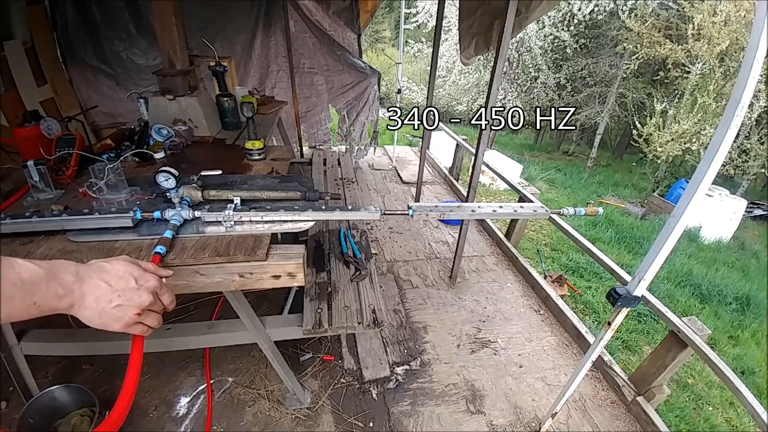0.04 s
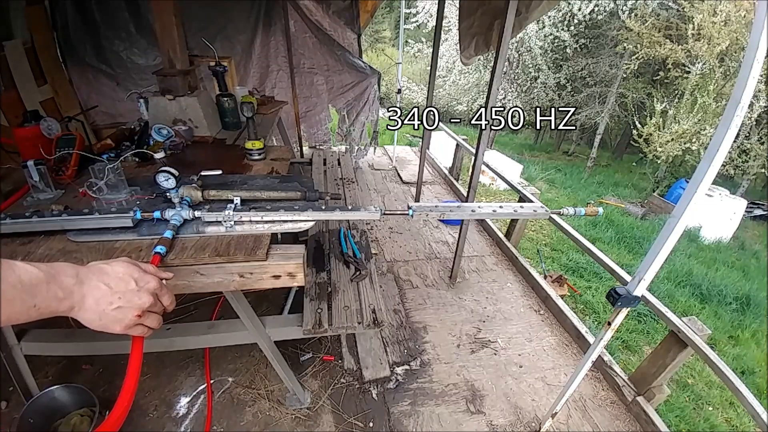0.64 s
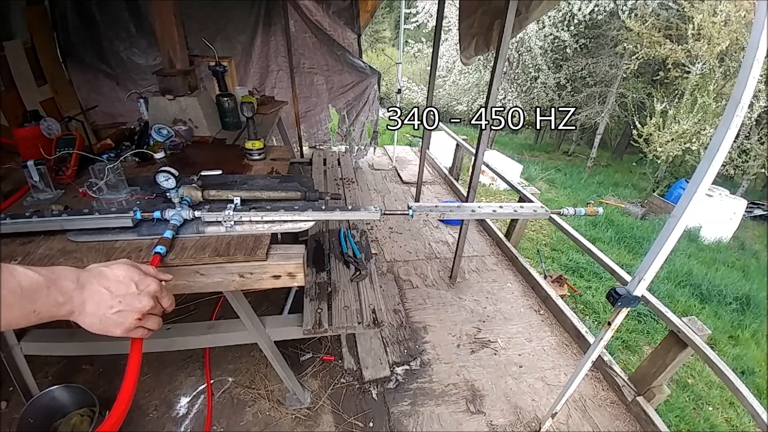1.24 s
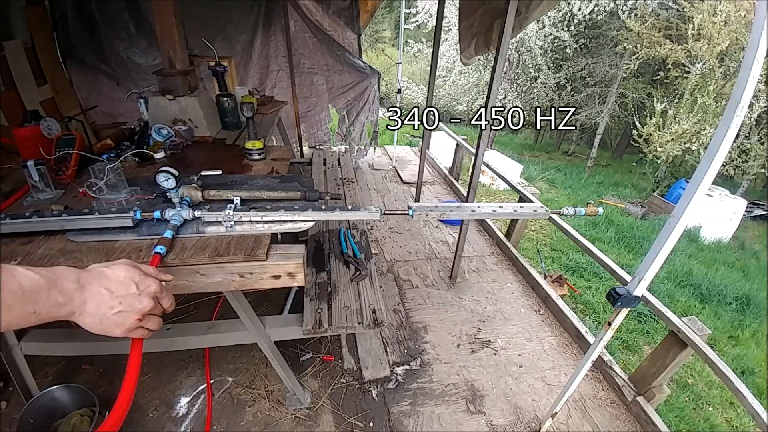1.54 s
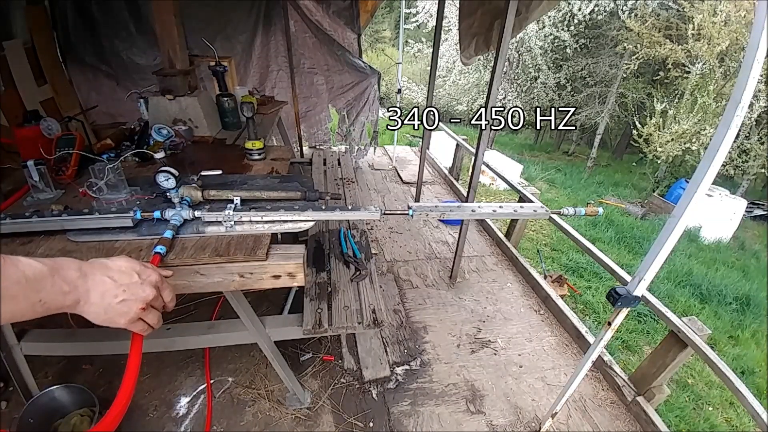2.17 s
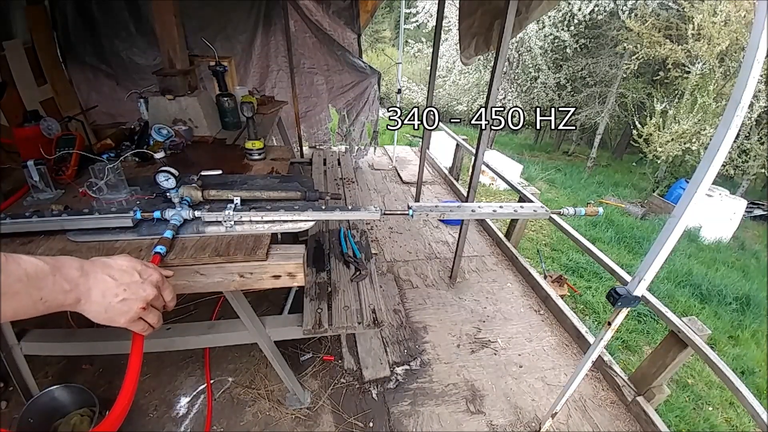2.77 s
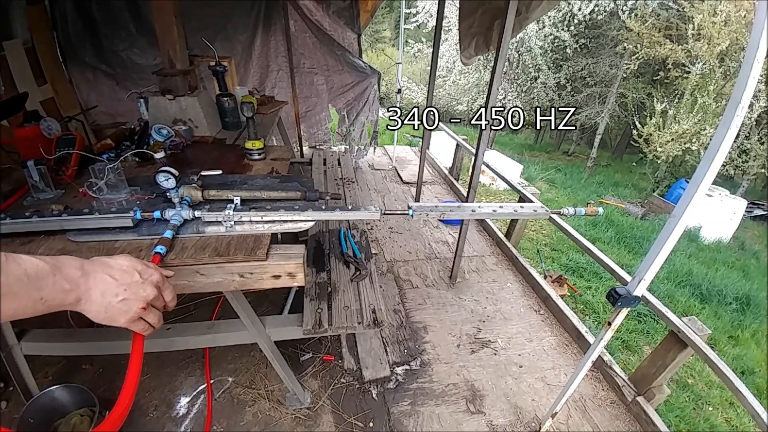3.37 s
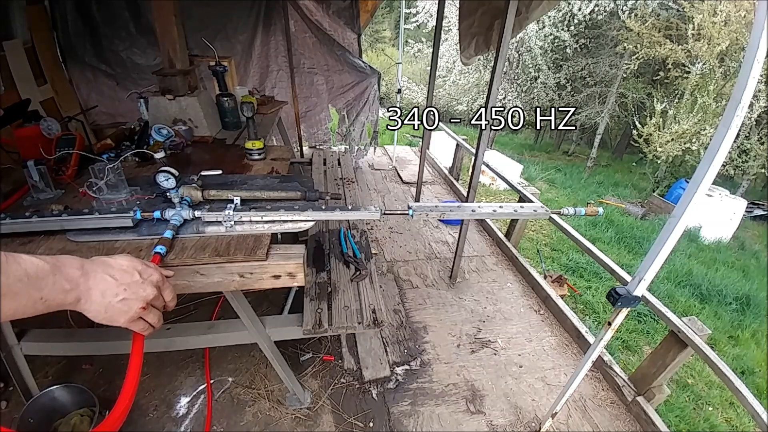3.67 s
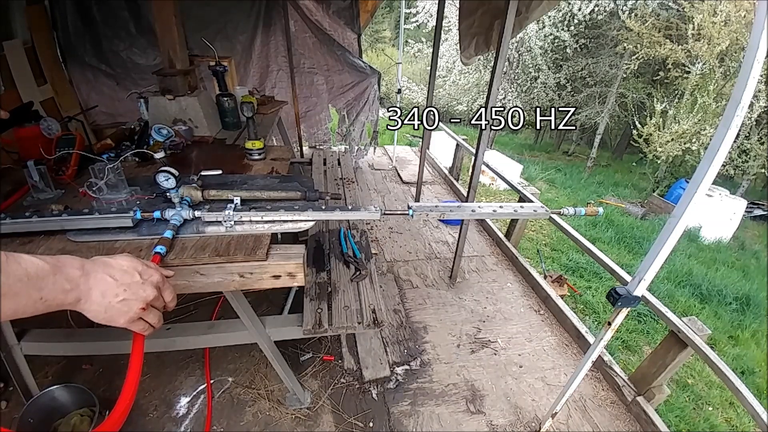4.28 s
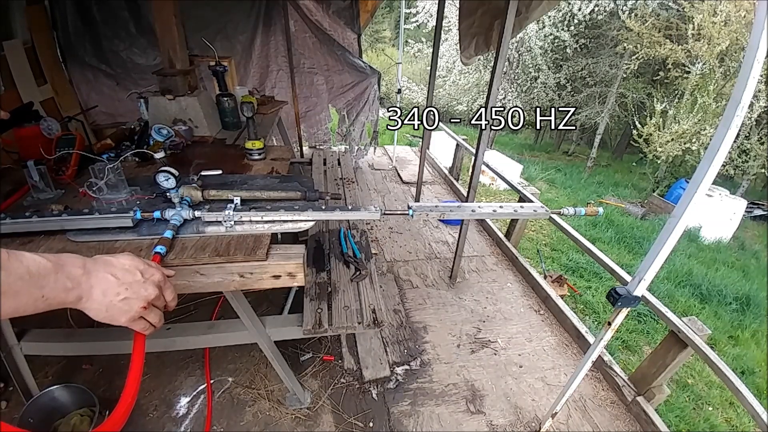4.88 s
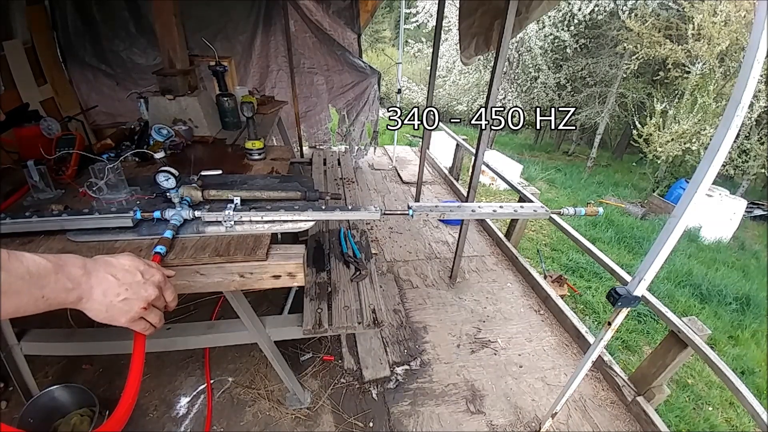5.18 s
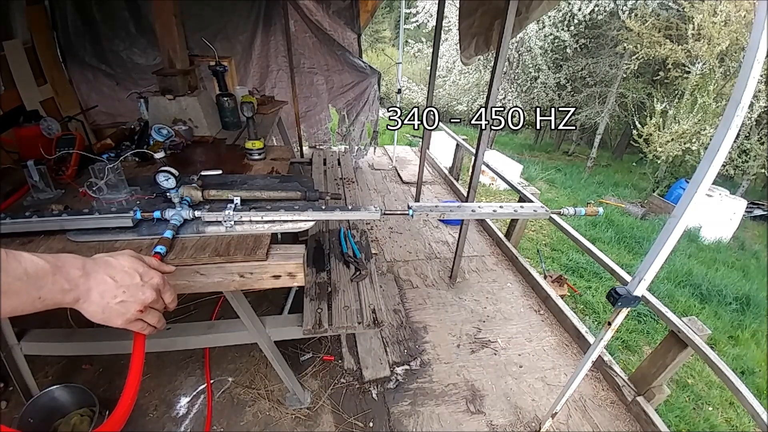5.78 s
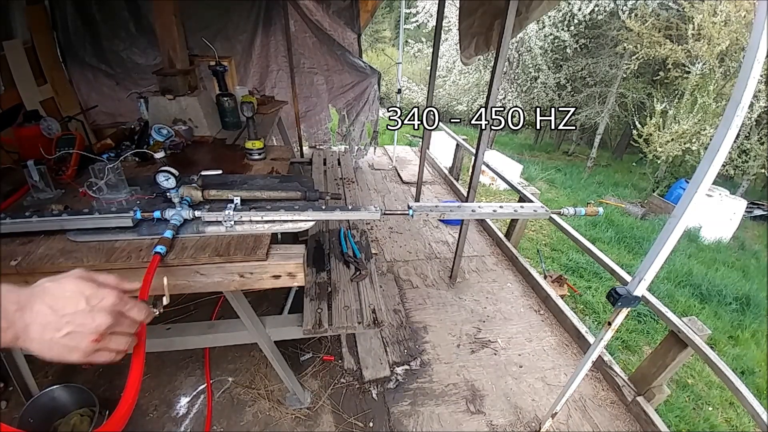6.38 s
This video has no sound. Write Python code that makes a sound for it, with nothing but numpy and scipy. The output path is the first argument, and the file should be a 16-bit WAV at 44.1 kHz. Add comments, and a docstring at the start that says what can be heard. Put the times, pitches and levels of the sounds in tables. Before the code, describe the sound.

Loud, slightly overloaded buzzing drone of a homemade pulse jet, which rises in pitch, sputters and pops, then runs on steadily.

```python
"""Pulse jet on a bench

A small homemade pulse jet runs flat out in an open shelter, close to an overloaded stereo microphone.
The flame locks to the lowest pipe mode and fires about 300 times a second: a strong tone, ragged
overtones, flame roar and a burst of jet noise on every cycle. Now and then it falters; near two seconds
the pitch climbs, the firing breaks into a sputter with ringing pipe modes, then catches again."""
import sys
import numpy as np
from scipy import signal
from scipy.fft import rfft, irfft, next_fast_len
from scipy.io import wavfile
from scipy.ndimage import uniform_filter1d

SR = 44100
rng = np.random.default_rng(int(sys.argv[2]) if len(sys.argv) > 2 else 0)


def unload_wav(signal):
    """Save mono or channel-first audio to the path in sys.argv[1] as 16-bit WAV at rate SR, clipped to [-1, 1]."""
    wavfile.write(
        sys.argv[1],
        SR,
        np.round(np.clip(np.atleast_2d(signal).T, -1, 1) * 32767).astype(np.int16),
    )


N = 291942

# resonances of engine and shelter: f/Hz, bandwidth/Hz, level/dB
SHELTER_MODES = [(600.8, 24, -5), (810, 29, -9), (897, 26, -4.5), (967, 35, 1.5), (1034, 66, 5),
                 (1193, 59, 1.5), (1261, 16, 5), (1486.5, 27, 0.5), (1789, 34, -4), (2510, 440, -27),
                 (3230, 81, -25), (3760, 38, -42)]
# stalls, in which the flame loses the pipe: start t/s, catch t/s, depth (0-1), pop level/dB
STALLS = [(1.885, 2.002, 1, -12), (2.099, 2.541, .97, -16), (2.598, 2.663, 0.89, -33),
          (2.715, 2.754, .75, -12), (5.545, 5.567, 0.42, -17)]


def from_db(db):
    """Amplitude ratio of a level in decibels."""
    return 10 ** (np.asarray(db) / 20)


def rms_one(x):
    """Normalisation to unit rms."""
    return x / np.sqrt(np.mean(x ** 2) + 1e-20)


def colour(x, curve):
    """Zero-phase filtering by a curve (f/Hz, level/dB), interpolated in log frequency."""
    size = next_fast_len(N + 4096)
    hz, db = np.transpose(curve)
    bins_hz = np.maximum(np.fft.rfftfreq(size, 1 / SR), 1)
    response = from_db(np.interp(np.log(bins_hz), np.log(hz), db))
    return irfft(rfft(x, size) * response, size)[..., :N]


def drift(rate_hz):
    """Random fluctuation of unit rms: noise low-passed near rate_hz."""
    pole = np.exp(-20 * np.pi * rate_hz / SR)  # at a tenth of the sample rate
    slow = signal.lfilter([1], [1, -2 * pole, pole * pole], rng.standard_normal(N // 10 + 2002))[2000:]
    return np.interp(np.arange(N) / 10, np.arange(len(slow)), rms_one(slow))


def resonance(x, hz, width_hz):
    """Forced response of a damped resonator with unit peak gain."""
    radius = np.exp(-np.pi * width_hz / SR)
    feedback = [1, -2 * radius * np.cos(2 * np.pi * hz / SR), radius ** 2]
    return signal.lfilter(np.array([1, 0, -1]) * (1 - radius ** 2) / 2, feedback, x)


def ring(x, modes):
    """Modal superposition: a body responds as the sum of its resonances."""
    return sum(from_db(db) * resonance(x, hz, width_hz) for hz, width_hz, db in modes)


def turbulence(diffuse):
    """Partly coherent white noise: the diffuse share of its power differs between the two ports."""
    coherent = np.sqrt(1 - diffuse) * rng.standard_normal(N)
    return coherent + np.sqrt(diffuse) * rng.standard_normal((2, N))


def faltering(falters, late_s, sigma_s):
    """A Gaussian pulse for each falter, as high as its rise in firing rate."""
    t = np.arange(0, N, 20) / SR
    bumps = sum(rise_hz * np.exp(-.5 * ((t - at_s - late_s) / sigma_s) ** 2) for at_s, rise_hz in falters)
    return np.interp(np.arange(N) / SR, t, bumps)


def swells(times, heights, peak_s):
    """Critically damped impulse responses, each reaching its height after peak_s."""
    age = np.maximum(np.arange(N) / SR - times[:, None], 0) / peak_s
    return (heights[:, None] * age * np.exp(1 - age)).sum(axis=0)


def firing_phase(rate_hz, strain, sputter, sag_hz):
    """Frequency modulation: the firing wavers under strain and turns slow and erratic in a stall."""
    wander_hz = (2.944 + 2.57 * strain) * drift(24.277)
    jitter_hz = (5.57 + 28.08 * sputter) * drift(162.5)
    return 2 * np.pi * np.cumsum(rate_hz - sag_hz * sputter + wander_hz + jitter_hz) / SR


def pipe_tone(phase, sputter, rough_db):
    """Standing wave of the lowest pipe mode; sputtering deepens its random amplitude modulation."""
    return np.sqrt(2) * np.cos(phase) * from_db(rough_db * (1 + 3 * sputter) * drift(70))


def overtones(phase, sputter, rough_db, jitter_rad):
    """Steep, uneven exhaust fronts carry harmonics, which honk as they sweep through the resonances."""
    front = phase + jitter_rad * drift(147)
    harmonics = sum(from_db(rough_db * drift(60)) * np.cos(k * front) for k in np.arange(2, 13))
    return ring(harmonics, SHELTER_MODES) * (1 - 0.45 * sputter)


def flame_roar(phase, throb, modes_db):
    """Combustion noise, amplitude-modulated by the firing, excites engine and shelter resonances."""
    # spectrum of the flame: f/Hz, relative level/dB
    roar_spectrum = [(25, -5.5), (130, -6.5), (240, 6), (330, 8.5), (390, -1.5), (520, 4.5), (650, -1.5),
                     (780, 5.5), (1130, -2.5), (1420, -24), (1750, 3.5), (2200, -41), (4000, -47)]
    noise = turbulence(diffuse=0.64) * (1 + throb * np.cos(phase))
    return rms_one(colour(noise, roar_spectrum) + from_db(modes_db) * ring(noise, SHELTER_MODES))


def jet_noise(phase, burst_db, crackle_db):
    """Turbulent mixing noise: hot gas tears out once a cycle, in bursts of uneven strength."""
    # the hiss as heard through the microphone, with a notch near 10.5 kHz: f/Hz, relative level/dB
    heard_hiss_spectrum = [(500, -31), (1400, -3), (2100, -2.5), (3100, 0), (3900, 0.5), (5000, -1.5),
                           (7000, -5.5), (8500, -0.5), (9400, -3), (10500, -27), (11800, -15.5),
                           (13500, -11), (15600, -19)]
    # resonances that the jet excites: f/Hz, bandwidth/Hz, level/dB
    jet_modes = [(2564, 44, -2.5), (3080, 23, 0.5), (3556, 32, 2), (4620, 28, -5)]
    burst = np.cos(phase - 1.0) + 0.14 * np.cos(2 * phase - 1.3)
    outflow = turbulence(diffuse=0.72) * from_db(burst_db * burst + crackle_db * drift(180))
    hiss = colour(outflow, heard_hiss_spectrum)
    return rms_one(hiss + ring(hiss, jet_modes))


def pipe_ringing(flare_db):
    """Broadband excitation: uneven puffs of turbulence drive the higher modes of the pipe."""
    # higher pipe modes: f/Hz, bandwidth/Hz, relative level/dB
    pipe_modes = [(753.5, 19.1, 8.5), (1043, 58, 10.5), (1794, 18.6, 6.5), (2606, 100, -5.5),
                  (2790, 36, -9), (3599, 64, -3.5), (4390, 41, -13), (4830, 50.7, -6), (6110, 28, 1),
                  (8160, 300, -1.5), (13100, 2800, -21)]
    puffs = turbulence(diffuse=.17) * from_db(flare_db * drift(25))
    return rms_one(ring(puffs, pipe_modes))


def slight_falters(count, max_rise_hz):
    """Random perturbations of the firing, one in each equal stretch of the run: t/s, rise/Hz."""
    return [((k + when) / count * N / SR, max_rise_hz * (1 + size) / 2)
            for k, (when, size) in enumerate(rng.random((count, 2)))]


def barks(phase, falters, hz, width_hz):
    """Mode coupling: in a falter the lowest mode briefly drives the one near its third multiple."""
    drive = faltering(falters, late_s=-.003, sigma_s=.0045) * np.cos(3 * phase + .7 * drift(100))
    return resonance(drive, hz, width_hz)


def sputtering(attack_s, release_s):
    """Loss of lock between flame and pipe, as an envelope: 0 locked, 1 fully stalled."""
    t = np.arange(N) / SR
    stalls = sum(depth * np.clip(np.minimum((t - start) / attack_s, 1 - (t - catch) / release_s), 0, 1)
                 for start, catch, depth, _ in STALLS)
    return np.clip(stalls, 0, 1)


def flame_rumble(sputter):
    """Unsteady combustion radiates low-frequency noise while the flame sputters."""
    # spectrum of the sputtering flame: f/Hz, relative level/dB
    rumble_spectrum = [(25, -39), (110, -20), (175, -4.5), (210, -3), (270, 6.5), (325, 5), (375, -11.5),
                       (470, -5.5), (640, -12.5), (900, -11), (1300, -31), (3000, -56)]
    return sputter * rms_one(colour(turbulence(diffuse=.02), rumble_spectrum))


def pops(times, peaks_db, peak_s):
    """Sudden heat release: unburnt gas goes off in a dull burst as the flame catches."""
    pop_spectrum = [(30, -9), (180, -11), (530, 1), (750, -4), (3000, -48)]  # f/Hz, relative level/dB
    envelope = swells(times, from_db(peaks_db), peak_s)
    return envelope * rms_one(colour(rng.standard_normal(N), pop_spectrum))


def at_ports(x, lag_s):
    """Path difference delays the right microphone port; each port has its own frequency response."""
    # balance of the ports: f/Hz, left minus right level/dB
    port_balance = [(330, 0.5), (500, 1), (770, 1), (1170, -1), (1790, -3), (2740, 1), (4190, -1.5),
                    (6410, -1), (9810, 5), (14000, -1)]
    left = colour(x[0], [(hz, db / 2) for hz, db in port_balance])
    right = colour(x[1], [(hz, -db / 2) for hz, db in port_balance])
    n = np.arange(N)
    return np.array([left, np.interp(n - np.round(lag_s * SR), n, right)])


def limiter(x, limit_db, release_db_per_s):
    """Peak limiting: each surge pulls the gain down at once, hiss and all; it recovers steadily."""
    level = uniform_filter1d(np.abs(x).max(axis=0), size=16)
    over_db = np.maximum(20 * np.log10(level + 1e-9) - limit_db, 0)
    recovery_db = release_db_per_s * np.arange(N) / SR
    held_db = np.maximum.accumulate(over_db + recovery_db) - recovery_db
    return x * from_db(-uniform_filter1d(held_db, size=64))


def scene():
    """Superposition of the engine's voices, whose levels follow strain, stalls and falters."""
    # firing rate while the flame is locked to the pipe: t/s, f/Hz
    locked_rate = [(0, 301), (1.05, 301), (1.8, 339), (2.1, 333), (2.85, 299), (3.4, 297.5), (6.62, 298)]
    # strong falters, each a few hurried cycles and a surge: t/s, rise in firing rate/Hz
    strong_falters = [(.079, 33.5), (.18, 32), (.22, 25), (.302, 30), (.486, 36), (.539, 31), (.714, 23.6),
                      (1.103, 27.2), (1.264, 20.2), (1.324, 17.3), (1.562, 22), (1.69, 13.72), (2.827, 28),
                      (2.885, 27.6), (2.951, 30.24), (3.049, 28), (3.182, 37.8), (3.349, 26.3),
                      (3.534, 28.4), (3.817, 22.5), (3.944, 28.05), (4.121, 35.5), (4.335, 23.3),
                      (5.213, 24.4), (5.283, 21.6), (5.565, 40), (5.716, 27.7), (5.949, 26.5), (6.147, 41),
                      (6.515, 26.7)]
    easy_hz, near_stall_hz = 298, 339
    locked_hz = np.interp(np.arange(N) / SR, *np.transpose(locked_rate))
    strain = (locked_hz - easy_hz) / (near_stall_hz - easy_hz)
    sputter = sputtering(attack_s=.04, release_s=.03)
    starts, catches, depths, pops_db = np.transpose(STALLS)
    choke = swells(starts, depths, peak_s=.018)
    surge = swells(catches, depths, peak_s=.026)
    falters = strong_falters + slight_falters(count=12, max_rise_hz=17)
    hurry_hz = faltering(falters, late_s=.001, sigma_s=.0075)
    phase = firing_phase(locked_hz + hurry_hz, strain, sputter, sag_hz=47.07)
    # in a falter the tone sags, then overshoots, and the hiss dips
    sag_db = .2 * faltering(falters, late_s=-.003, sigma_s=.0035)
    overshoot_db = .14 * faltering(falters, late_s=.011, sigma_s=.0055)
    dip_db = .12 * faltering(falters, late_s=.015, sigma_s=.015)

    def gain(easy_db, strain_db, stall_db, choke_db):
        """Gains add in decibels: easy running plus the changes at full strain, stall and choke."""
        return from_db(easy_db + strain_db * strain + stall_db * sputter + choke_db * choke)

    tone_gain = gain(-8.7, -.2, -4.5, -4) * from_db(overshoot_db - sag_db + 1.9 * surge)
    tone = tone_gain * pipe_tone(phase, sputter, rough_db=0.87)
    buzz = gain(-20, -1, -1, -2) * overtones(phase, sputter, rough_db=3.0, jitter_rad=0.16)
    bark = from_db(-45.5) * barks(phase, falters, hz=981, width_hz=57)
    roar = gain(-18.5, -1.5, 2, -2.5) * flame_roar(phase, throb=0.29, modes_db=-6.5)
    jet_gain = gain(-15, -3.5, -.8, -4) * from_db(.5 * drift(2.2) - dip_db - 3.2 * surge)
    jet = jet_gain * jet_noise(phase, burst_db=2.0, crackle_db=0.84)
    rumble = from_db(-9) * flame_rumble(sputter)
    ringing = gain(-29, 12, 9.5, -11) * pipe_ringing(flare_db=2.5)
    popping = pops(catches, pops_db, peak_s=.0091)
    return at_ports(tone + buzz + bark + roar + jet + rumble + ringing + popping, lag_s=.00007)


def record(dry):
    """Overload: limiting, soft saturation of the remaining peaks, then a steep low-pass."""
    limited = limiter(dry, limit_db=-1, release_db_per_s=154)
    rounded = limited / (1 + np.abs(limited) ** 10) ** (1 / 10)
    cutoff_hz = 15600
    return signal.sosfilt(signal.ellip(10, .1, 70, cutoff_hz, fs=SR, output="sos"), rounded)


dry = scene()
out = record(dry)
unload_wav(out)
```